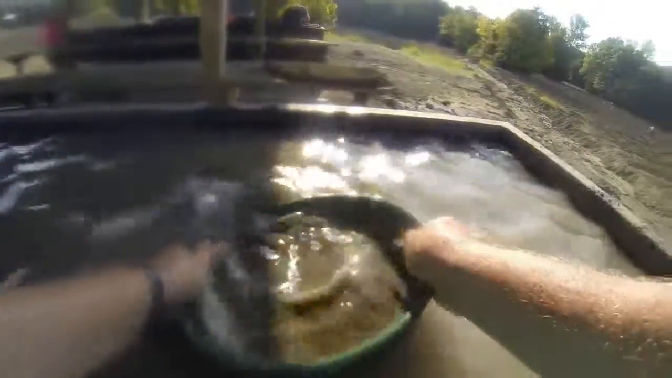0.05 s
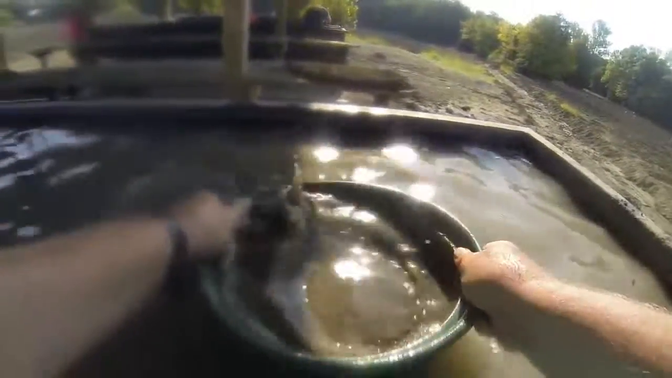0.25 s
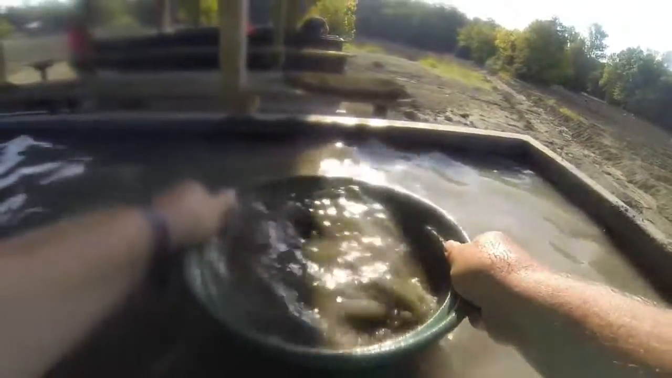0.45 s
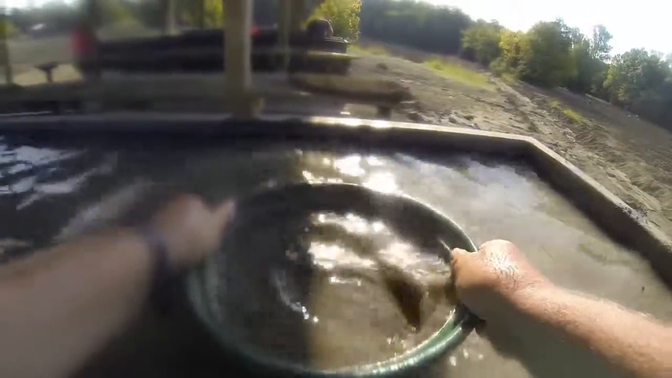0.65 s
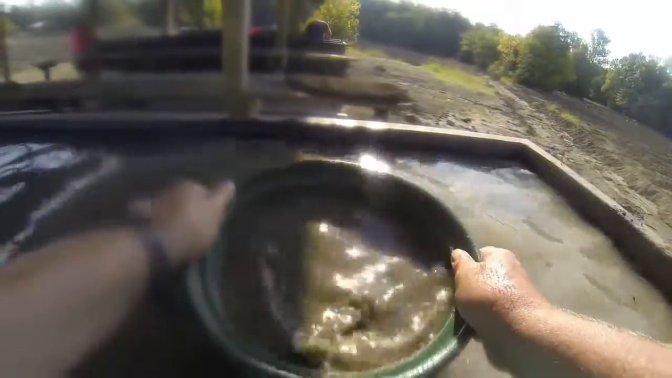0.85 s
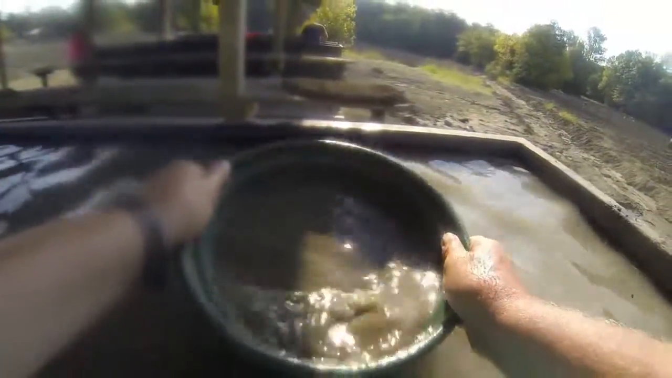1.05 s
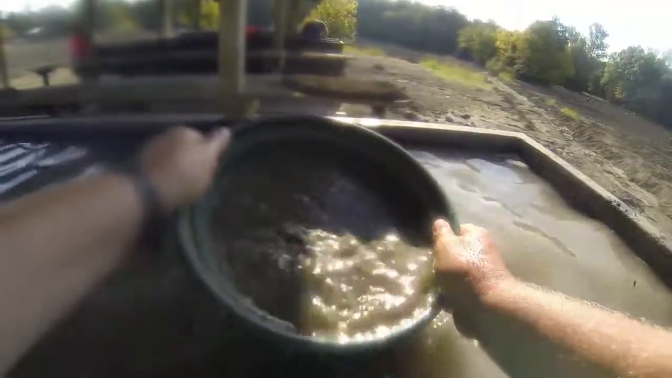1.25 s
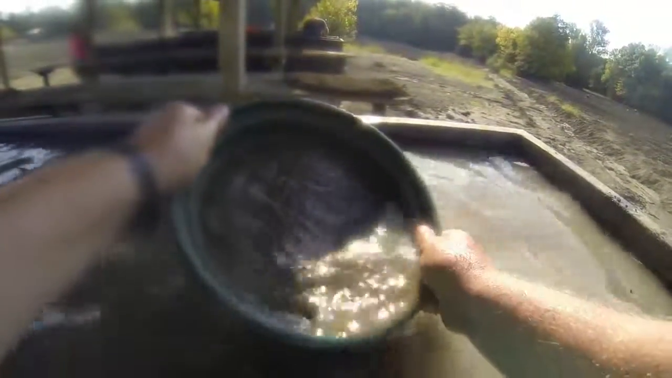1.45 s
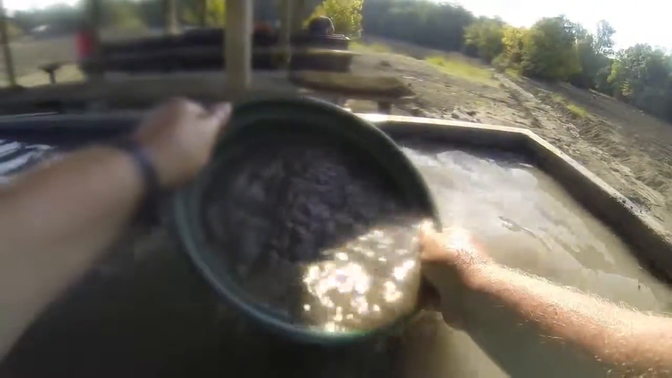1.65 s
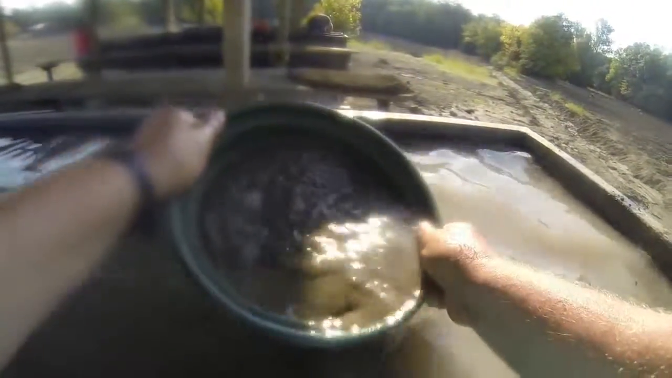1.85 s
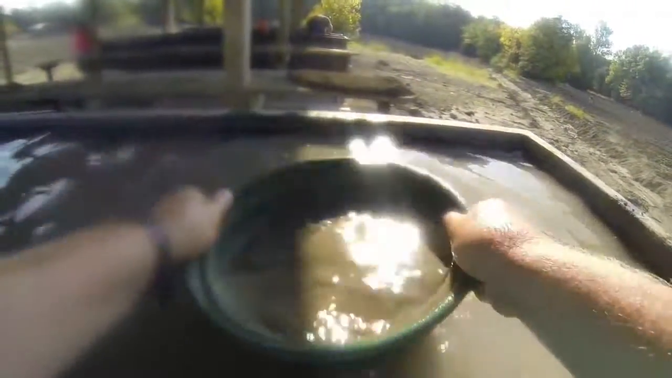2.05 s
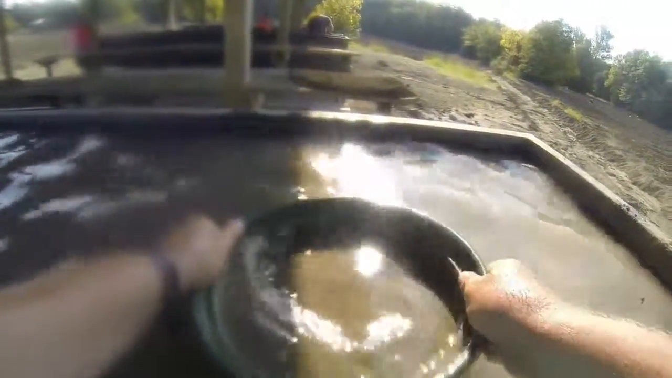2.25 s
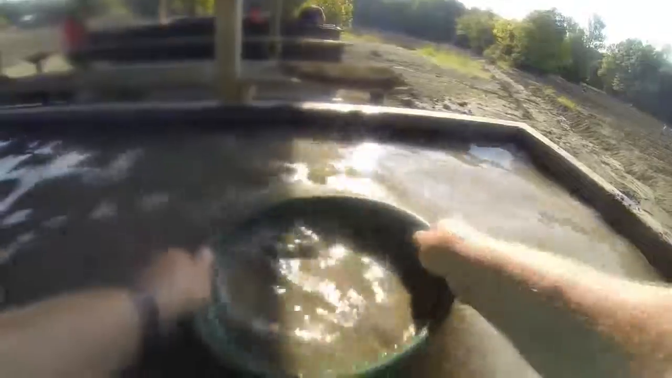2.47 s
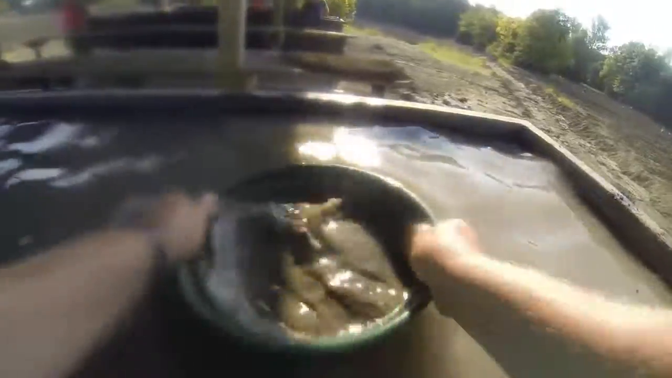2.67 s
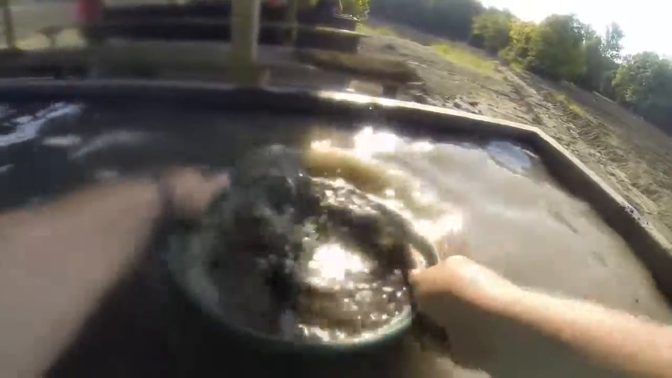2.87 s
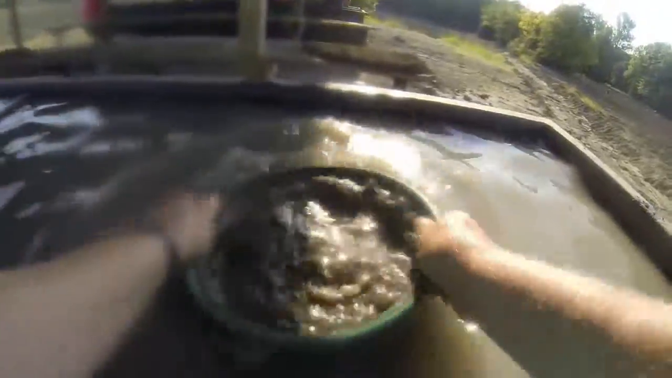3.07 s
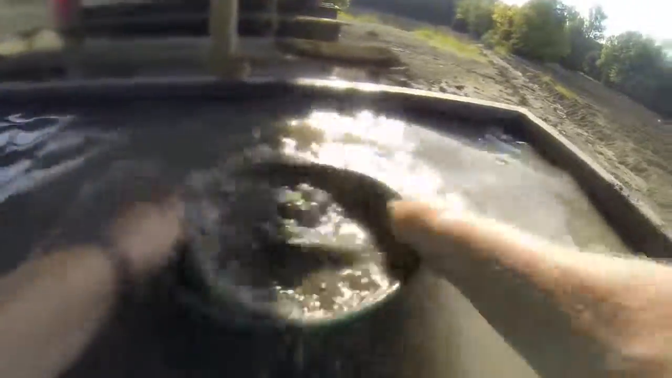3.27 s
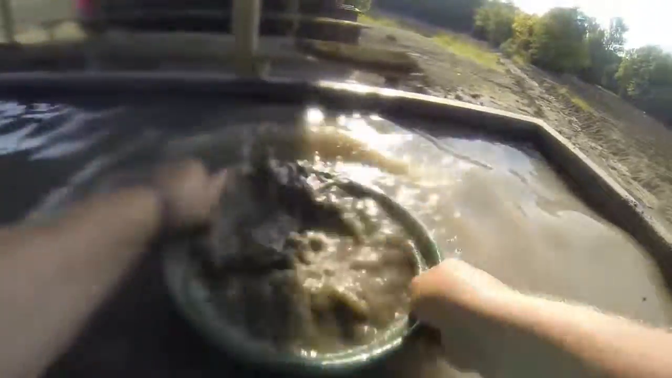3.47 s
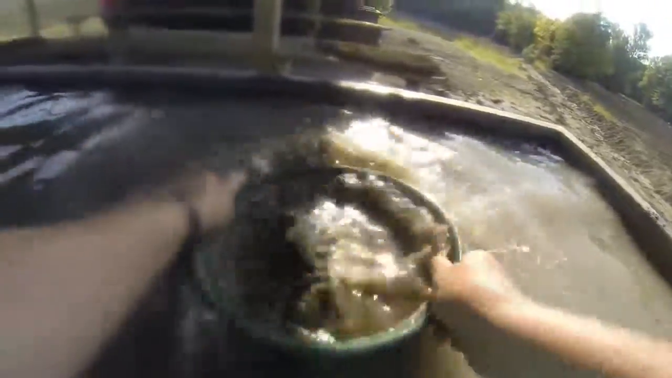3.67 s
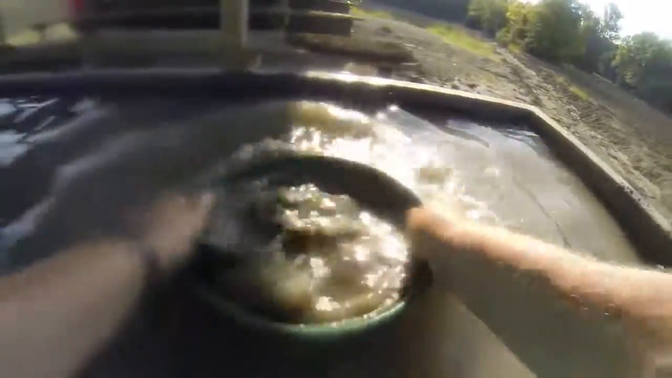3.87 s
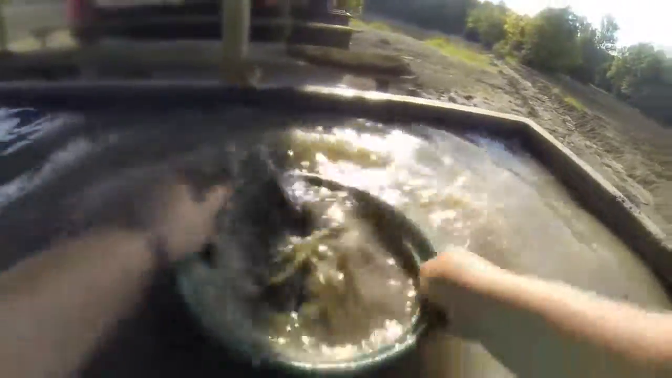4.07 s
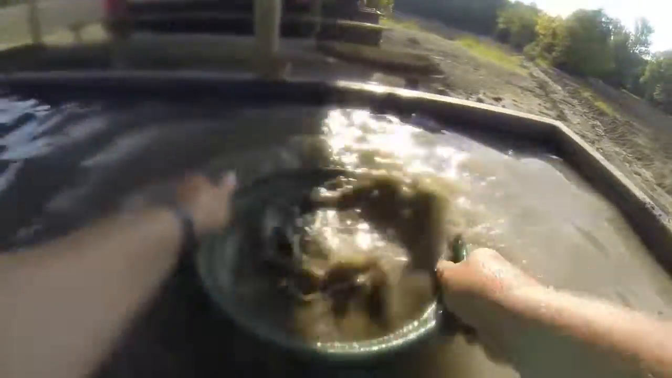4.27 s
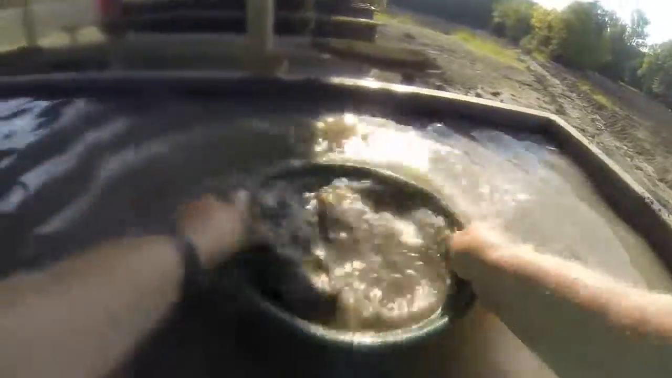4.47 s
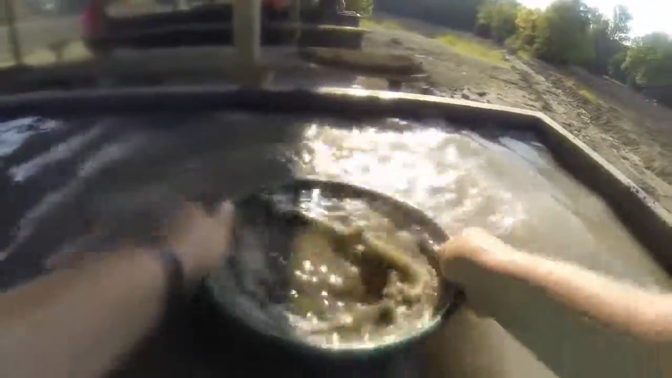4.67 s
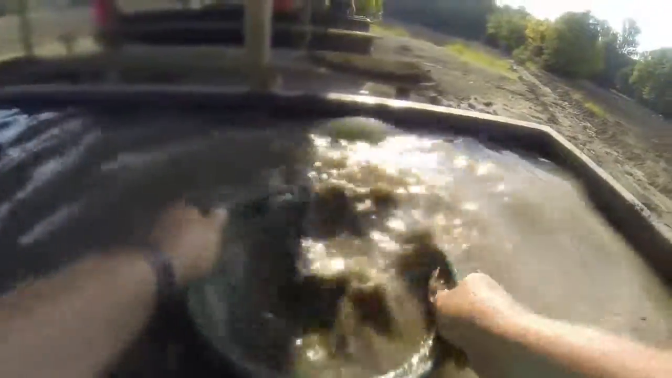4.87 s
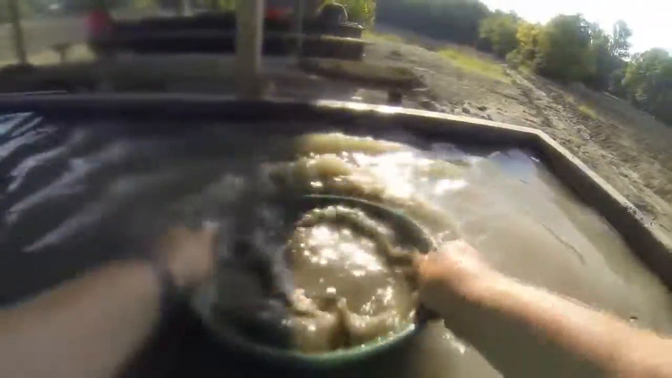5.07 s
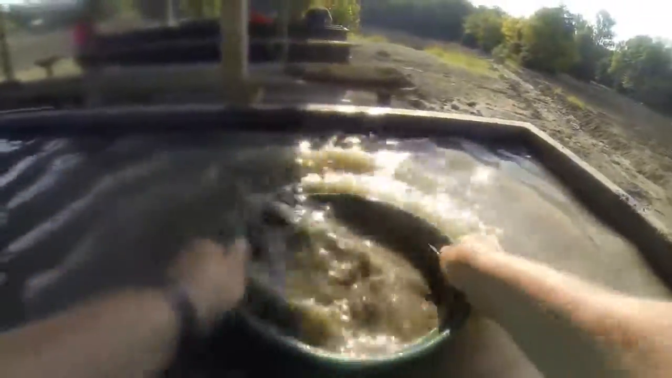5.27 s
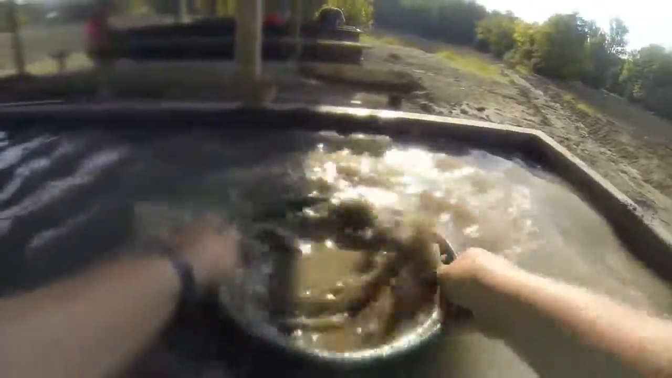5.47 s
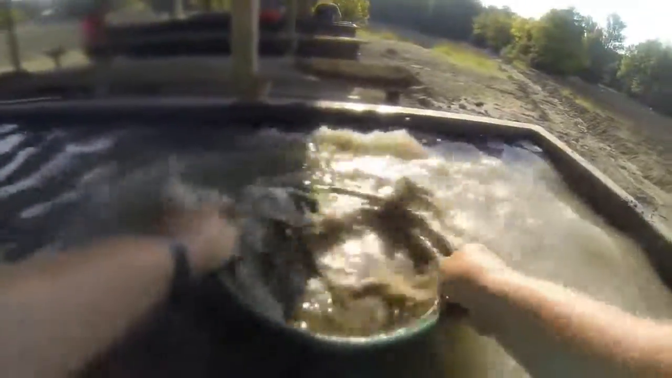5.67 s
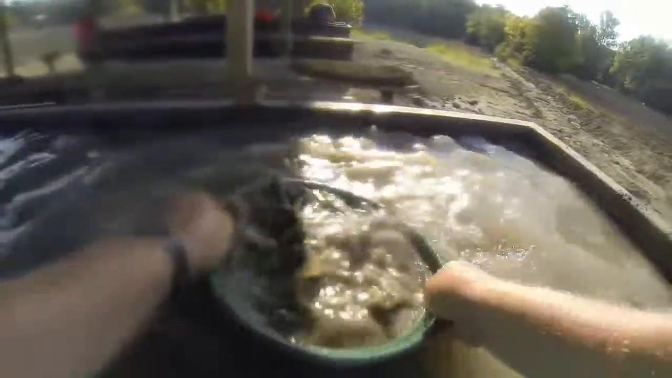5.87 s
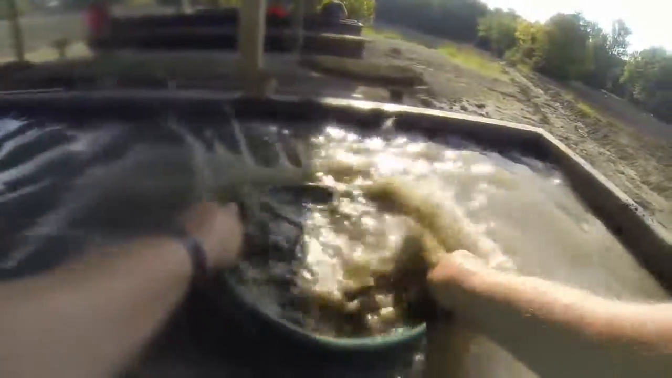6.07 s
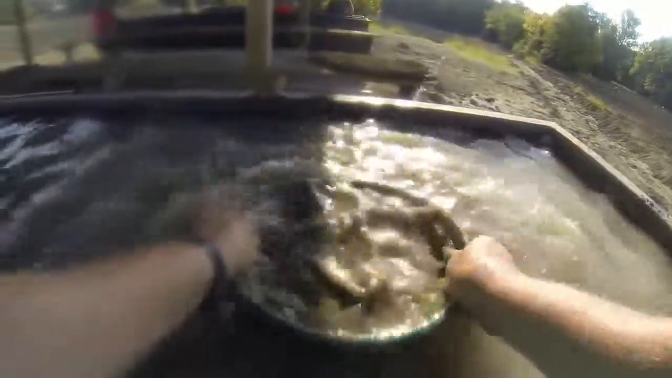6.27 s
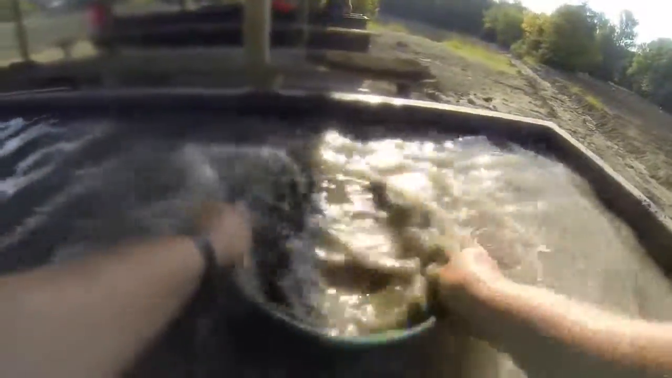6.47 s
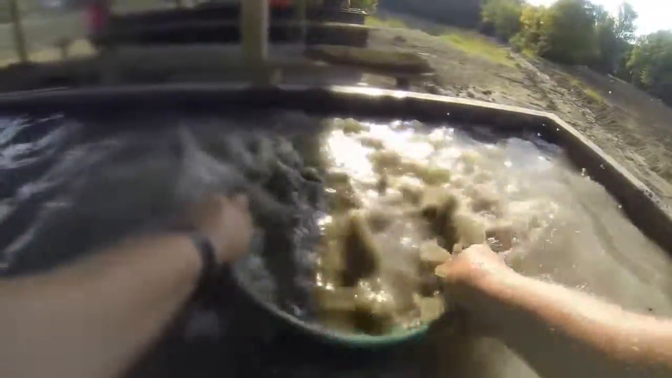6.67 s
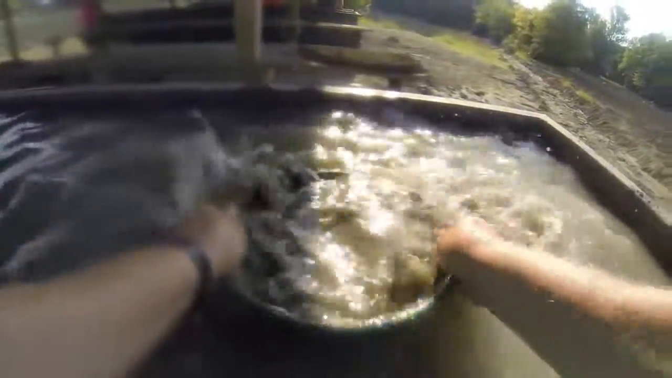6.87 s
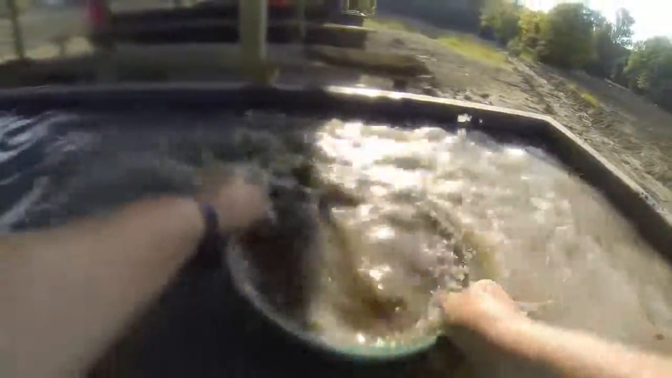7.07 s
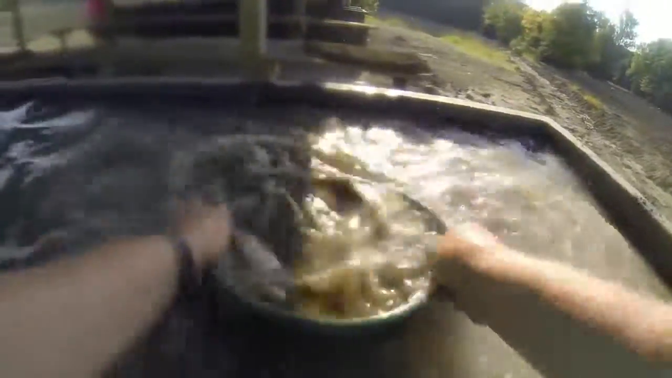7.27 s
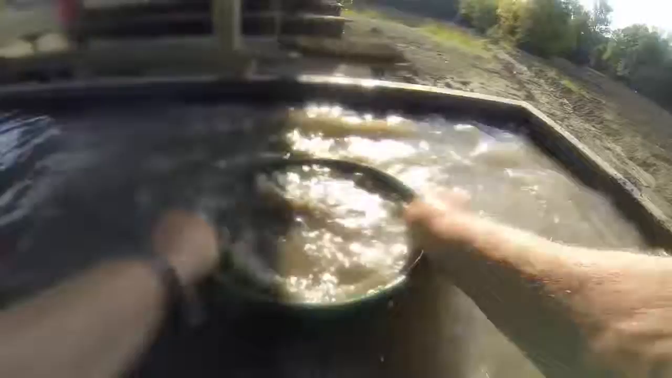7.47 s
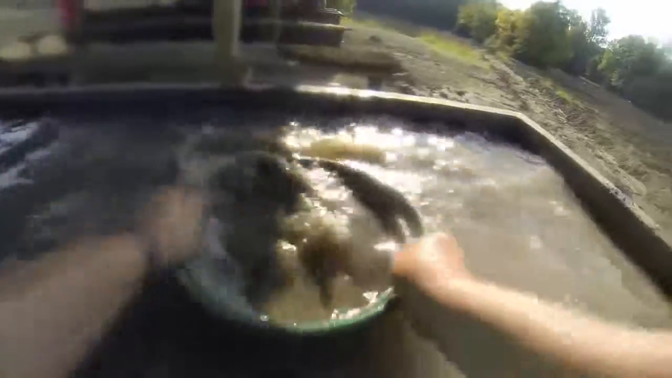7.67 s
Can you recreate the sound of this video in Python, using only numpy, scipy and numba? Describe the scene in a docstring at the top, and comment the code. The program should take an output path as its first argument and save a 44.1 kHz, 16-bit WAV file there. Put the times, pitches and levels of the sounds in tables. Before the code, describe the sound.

A sieve drips softly, then is shaken in water with boxy sloshing, plopping bubbles, ticking stones and rumbling handling bumps.

```python
"""A sieve of dirt and stones is shaken in a water trough, heard inside the case of a body-worn camera.
It opens on a brief slosh and a few thumps of the strap; then the sieve drains in clear drips while
insects buzz faintly over a quiet field. Just after two seconds the shaking sets in and runs to the end:
bubbles plop, stones tick, and the wash and spray colour through the case's resonances. The shakes
knock the case on its mount and heave the body, which rumbles and thumps."""
import sys
import numpy as np
from scipy import signal
from scipy.io import wavfile
from scipy.ndimage import uniform_filter1d
from numba import njit

SR = 44100
rng = np.random.default_rng(int(sys.argv[2]) if len(sys.argv) > 2 else 0)


def generate_wav(sig):
    """Save sig (samples, or channels by samples) to the path in sys.argv[1] as 16-bit PCM at SR."""
    pcm = np.round(np.clip(np.atleast_2d(sig).T, -1, 1) * 32767).astype(np.int16)
    wavfile.write(sys.argv[1], SR, pcm)


N = 340893


def undb(db):
    return 10 ** (np.asarray(db) / 20)


def level(x, db):
    return x * undb(db) / np.sqrt(np.mean(x ** 2))


@njit
def bandpass(x, hz, width):
    """State-variable band-pass, gain 1 at the centre."""
    y, mid, low = np.empty(len(x)), 0., 0.
    g, damping = np.tan(np.pi * hz / SR), width / hz
    for i in range(len(x)):
        v = (mid + g * (x[i] - low)) / (1 + g * (g + damping))
        mid, low, y[i] = 2 * v - mid, low + 2 * g * v, damping * v
    return y


def band(hz, width):
    """Noise in a steep band, rms 1."""
    return level(bandpass(bandpass(rng.standard_normal(N), hz, width), hz, width), 0)


def flutter(rate):
    """Smooth random motion, rate steps a second, spread near 1."""
    hold = int(SR / rate)
    steps = np.repeat(rng.standard_normal(N // hold + 1), hold)
    return 1.93 * uniform_filter1d(uniform_filter1d(steps, hold), hold)[:N]


@njit
def rings(starts, hz, t60, size, rise, glide):
    """Damped tones with an attack time of rise seconds; pitch bends by the share glide in one t60."""
    out = np.zeros(N)
    for e in range(len(starts)):
        first, n = int(starts[e] * SR), max(t60[e] * SR, 4.)
        phase, env, hush = 0., size[e], 1.
        fall, lift = 1000. ** (-1 / n), np.exp(-1 / (rise * SR))
        for i in range(min(int(n), N - first)):
            phase += 2 * np.pi * min(hz[e] * (1 + glide * i / n) / SR, .45)
            env, hush = env * fall, hush * lift
            out[first + i] += env * (1 - hush) ** 2 * np.sin(phase)
    return out


def puffs(starts, size, rise, fall):
    """An envelope with a soft-edged puff at each start; rise and fall in seconds."""
    hits = np.zeros(N)
    np.add.at(hits, (starts * SR).astype(int), size)
    for tau in (rise, fall):
        hits = signal.lfilter([1], [1, -np.exp(-1 / (tau * SR))], hits)
    return hits / (rise * SR)


def scatter(per_s, spread_db, clump):
    """Random starts, sizes (many small, a few large, louder in clumps) and a 0-1 draw for pitch."""
    when, weight, pitch = rng.random((int(per_s * N / SR), 3)).T
    starts = when * (N - 1) / SR
    large = np.minimum(-np.log(1 - weight), 3)
    return starts, clump[(starts * SR).astype(int)] * undb(spread_db * large), pitch


def swarm(per_s, low_hz, high_hz, cycles, spread_db, clump, rise, glide):
    """Random ringing grains over a range of pitch."""
    starts, size, pitch = scatter(per_s, spread_db, clump)
    hz = low_hz * (high_hz / low_hz) ** pitch
    return rings(starts, hz, cycles / hz, size, rise, glide)


# The bed of outdoor air. Each row: frequency in Hz, noise density in dB.
AIR_SPECTRUM = [(60, -75.5), (150, -99), (300, -89), (600, -102), (1300, -100), (2500, -105), (4500, -116),
                (8000, -120), (15000, -123)]
# The insect buzz. Each row: centre in Hz, width in Hz, level in dB.
INSECT_BANDS = [(5070, 210, -79.5), (7000, 2300, -83.5), (10110, 1700, -74.5)]


def field():
    """Steady insects over quiet air, whose half-octave bands flicker most in the lows."""
    air_hz, air_db = np.transpose(AIR_SPECTRUM)
    out = sum(undb(db) * band(hz, width) for hz, width, db in INSECT_BANDS)
    for hz in 60 * 2 ** np.arange(0, 8.1, .5):
        db = np.interp(np.log(hz), np.log(air_hz), air_db) + 10 * np.log10(hz / 3)
        flicker_db = np.interp(hz, (400, 2000), (3.5, 1.5)) * flutter(8.7)
        out += undb(db + flicker_db) * band(hz, hz / 2)
    return out


# The case hits its mount. Each row: start in seconds, level in dB.
MOUNT_HITS = [(0.319, -43.5), (2.515, -37), (2.697, -33), (2.742, -35), (2.819, -15), (2.993, -34),
              (3.07, -26), (3.377, -19.5), (3.685, -20.5), (3.951, -19), (4.231, -37), (4.279, -28.5),
              (4.473, -37), (4.553, -28.5), (4.868, -26.5), (5.122, -25), (5.383, -27), (5.502, -36),
              (5.639, -33), (7.283, -27), (7.577, -21)]
# The ring of the plastic. Each row: pitch in Hz, gain in dB, time to fall 60 dB in seconds.
PLASTIC_MODES = [(464, 4.5, 0.027), (367, -4.5, 0.035), (590, -11.5, 0.048), (776, 1, 0.0081),
                 (133.5, -11, 0.11)]


def knocks():
    """A sharp contact, then the plastic rings, and rings again more softly as the case rebounds."""
    starts, db = np.transpose(MOUNT_HITS)
    each = np.ones_like(starts)
    bite = undb(1.3 * db + 15)  # harder knocks are sharper
    contact = rings(starts, 1870 * each, .0069 * each, bite, rise=.00059, glide=-.64)
    starts, db = np.r_[starts + .0012, starts + .0085], np.r_[db, db - 9]  # hit, then rebound
    detune = 1 + .04 * rng.standard_normal(len(starts))  # each lands a little differently
    plastic = sum(rings(starts, hz * detune, np.full_like(starts, t60), undb(db + gain_db + 7),
                        rise=.00063, glide=0.) for hz, gain_db, t60 in PLASTIC_MODES)
    return plastic - contact


# How hard the body works. Each row: time in seconds, rumble level between jolts in dB.
EFFORT_CURVE = [(0.0, -15.5), (0.15, -46.5), (0.55, -33), (1.3, -51), (1.5, -41), (1.8, -57), (2.02, -40),
                (2.35, -47), (2.5, -27), (3.0, -27.5), (3.4, -27), (3.6, -30), (4.35, -30), (4.6, -29.5),
                (5.2, -33), (5.8, -31.5), (6.1, -35.5), (6.8, -32), (7.05, -32), (7.5, -32), (7.7, -27)]


def heave(t):
    """The rumble's fader in dB: slow effort, with a swell just after each hard knock."""
    jolt_db, late_s, width_s = 7.5, .053, .053
    starts, db = np.transpose(MOUNT_HITS)
    strengths = np.clip(1 + (db + 26) / 6, 0, 1)  # no jolt below -32 dB, a full one from -26 dB
    jolts = sum(strength * np.exp(-.5 * ((t - start - late_s) / width_s) ** 2)
                for start, strength in zip(starts, strengths))
    return np.interp(t, *np.transpose(EFFORT_CURVE)) + jolt_db * np.minimum(jolts, 1)


# Low thumps of the strap. Each row: start in seconds, level in dB, pitch in Hz.
STRAP_JERKS = [(0.248, -31, 113), (0.398, -19, 88), (0.662, -36, 67.3), (2.15, -42, 120),
               (2.329, -41.5, 152), (2.523, -17.5, 85), (2.762, -20.5, 104), (2.822, -26, 122),
               (2.996, -17, 73), (3.092, -15.5, 70.3), (3.209, -24, 89), (3.635, -23.5, 120),
               (3.766, -26, 140), (3.834, -31.5, 137), (3.924, -20.5, 71), (4.038, -28, 114),
               (4.179, -22, 130), (4.333, -36, 115), (5.391, -17, 76.5), (5.665, -21.5, 71.3),
               (6.216, -29, 69), (6.867, -24.5, 78), (7.084, -29.5, 125), (7.29, -29, 150),
               (7.413, -23.5, 71.6), (7.569, -15.5, 74.4)]


def body(rumble_db):
    """The chest heaves under the camera: deep rumble, small bumps of cloth, jerks as the strap goes taut."""
    starts, db, hz = np.transpose(STRAP_JERKS)
    pull = rings(starts, hz, 7 / hz, undb(db + 13), rise=.0072, glide=.054)
    snap = rings(starts + .00724, 1.113 * hz, 3.13 / hz, undb(db + 12.5), rise=.00025, glide=.066)
    cloth = swarm(90, 60, 380, cycles=3, spread_db=2.5, clump=undb(2 * flutter(9)), rise=.0015, glide=0.)
    cloth_db = uniform_filter1d(rumble_db, SR // 3) - 10
    rumble = band(19.7, 26.8) + level(band(14.75, 7.2), 1.16)
    return pull + snap + undb(rumble_db) * rumble + level(cloth, cloth_db)


# The boxy colour on the water. Each row: centre in Hz, width in Hz, gain in dB.
CASE_MODES = [(844, 907, -3), (1375, 108, 13), (1725, 73, 8), (1961, 134, 6), (2258, 376, 0.5),
              (3040, 1070, -7), (3970, 810, -11.5), (5160, 220, -10.5), (5590, 1350, -20), (6680, 600, -13),
              (8800, 12300, -28)]


def case(x):
    """The air in the closed case rings at its own modes, which alternate in polarity."""
    return sum((-1) ** k * undb(db) * bandpass(x, hz, width)
               for k, (hz, width, db) in enumerate(CASE_MODES))


# Clear drips while the sieve drains. Each row: start in seconds, level in dB, pitch in Hz.
DRAIN_DRIPS = [(0.162, -31, 1430), (0.1974, -29.5, 1243), (0.252, -30.5, 1446), (0.51, -28, 2130),
               (0.5363, -40, 2480), (0.634, -41, 2250), (0.7815, -38, 2020), (0.85, -34.5, 1950),
               (0.87, -43, 4360), (0.886, -35, 1980), (0.891, -33, 1440), (1.075, -45, 4500),
               (1.183, -37, 1304), (1.205, -39, 1980), (1.264, -33, 1460), (1.33, -28.5, 1270),
               (1.545, -38, 1630), (1.621, -40, 2980), (1.6886, -36, 1276), (1.714, -40, 1560),
               (1.748, -34, 1280)]


def drips():
    """Each drop leaves one bubble that climbs a little in pitch, inside a soft trickle."""
    starts, db, hz = np.transpose(DRAIN_DRIPS)
    trickle = puffs(starts, undb(db - 23.5), .0027, .015) * level(case(band(1080, 4000)), 0)
    return rings(starts, hz, 98 / hz, undb(db - 9.5), rise=.00049, glide=.078) + trickle


# Bright ticks on top. Each row: start in seconds, level in dB, pitch in Hz.
STONE_TICKS = [(0.1615, -36, 6560), (0.536, -45.5, 3440), (0.628, -47, 3220), (1.6904, -44, 3800),
               (1.7177, -45.5, 2950), (1.924, -38.5, 3140), (2.179, -36, 2850), (2.202, -36, 3800),
               (2.323, -42, 4970), (2.339, -35, 5570), (2.3618, -32.5, 3120), (2.772, -35, 5200),
               (2.882, -37, 3950), (3.084, -32, 7000), (3.15, -32, 3220), (3.172, -38, 5150),
               (3.4085, -42, 3800), (3.641, -44, 5060), (3.687, -29, 5640), (3.699, -32.5, 6260),
               (4.127, -44, 4860), (4.217, -43, 8800), (4.247, -36.5, 4050), (4.268, -41, 5960),
               (4.553, -48, 4140), (4.66, -40.5, 6440), (4.8382, -35.5, 3940), (5.146, -43, 6700),
               (5.33, -38, 3850), (5.423, -31, 5000), (5.49, -40, 5100), (5.639, -33, 9700),
               (5.762, -39, 5350), (5.879, -39, 5000), (5.942, -39.5, 3560), (6.011, -30, 3900),
               (6.032, -31.5, 4860), (6.061, -35.5, 4000), (6.13, -32, 3950), (6.2457, -32, 4030),
               (6.299, -27.5, 6100), (6.412, -32, 3490), (6.482, -35, 5970), (6.499, -39, 6600),
               (6.586, -35.5, 6340), (6.7, -38, 6000), (6.767, -38, 6840), (6.819, -35, 3900),
               (6.866, -38.5, 5550), (7.086, -39.5, 6300), (7.128, -40, 5560), (7.235, -32, 3760),
               (7.325, -41, 6440), (7.495, -42, 6100), (7.53, -45, 6640)]


def ticks():
    """Stones and drops tick: a short ring inside a spit of noise that is strongest near its pitch."""
    starts, db, hz = np.transpose(STONE_TICKS)
    ring = rings(starts, hz, 44 / hz, undb(db - 1), rise=.0007, glide=.04)
    fizz_db = db - 15 + 11 * np.log2(hz / 5000)  # the finest spray is brightest
    out = ring + puffs(starts, undb(fizz_db), .00024, .0014) * band(6900, 12000)
    for mid_hz in (2600, 4000, 6200):
        spit_db = db - 10 * np.abs(np.log2(hz / mid_hz))
        out += puffs(starts, undb(spit_db), .00029, .0043) * level(case(band(mid_hz, mid_hz)), -3.5)
    return out


# Big, up-front bubbles. Each row: start in seconds, level in dB, pitch in Hz.
BUBBLE_PLOPS = [(1.924, -36.5, 1323), (2.198, -30.5, 1327), (2.255, -27.5, 1333), (2.285, -39, 1350),
                (2.32, -29.5, 1234), (2.3364, -19, 1290), (2.4451, -21, 1390), (2.472, -25, 1440),
                (2.5114, -22, 1350), (2.7753, -25, 1394), (2.886, -29.5, 724), (2.997, -23.5, 1426),
                (3.103, -21.5, 1415), (3.1518, -21, 1304), (3.435, -30, 1335), (3.599, -28.5, 1280),
                (3.6823, -25, 1260), (4.046, -31, 1500), (4.247, -21.5, 1396), (4.427, -31.5, 1420),
                (4.473, -30.5, 1233), (4.569, -32.5, 1410), (4.6292, -26.5, 1320), (4.66, -30, 1276),
                (4.6806, -24.5, 1365), (4.741, -29, 1350), (5.11, -32, 1430), (5.3322, -27, 1292),
                (5.415, -29.5, 750), (5.634, -26, 1306), (5.723, -23.5, 1378), (5.7609, -26, 1380),
                (5.9418, -25.5, 1362), (6.008, -28.5, 1384), (6.0294, -25, 1400), (6.0405, -20.5, 1950),
                (6.106, -28, 1364), (6.1754, -25.5, 1380), (6.297, -27.5, 1388), (6.4048, -24.5, 1343),
                (6.482, -23.5, 1310), (6.6802, -22.5, 1170), (6.823, -22, 1366), (6.972, -28, 1385),
                (7.181, -33.5, 1720), (7.52, -28.5, 1410)]


def plops():
    """A bubble swells and rings; the slap of water around it shakes the case."""
    starts, db, hz = np.transpose(BUBBLE_PLOPS)
    tone = rings(starts, hz, np.full_like(starts, .044), undb(db + 2.5), rise=.0011, glide=.034)
    slap = puffs(starts, undb(db), .00099, .0099) * level(case(band(1340, 5000)), -9)
    return tone + slap


def foam(per_s, clump):
    """Bursting foam crackles softly: some spits fill one part of the treble, others all of it."""
    starts, size, _ = scatter(per_s, 4.5, clump)
    wide, out = puffs(starts, size, .001, .003), 0
    for hz in (3220, 4100, 6000, 8400, 12900):
        starts, size, _ = scatter(per_s, 4, clump)
        narrow = puffs(starts, size, .0012, .0032)
        out += (narrow + .4 * wide) * band(hz, hz * .6) * undb(.5 * np.log2(hz / 3200))
    return out


# How hard the sieve stirs the water. Each row: time in seconds, slosh level in dB, spray level in dB.
STIR_CURVE = [(0.0, -38, -46), (0.11, -56.5, -67), (0.34, -56.5, -64), (0.6, -58, -72),
              (1.12, -62.5, -69.5), (1.27, -58.5, -76), (1.57, -72.5, -72.5), (2.15, -59, -69),
              (2.39, -55.5, -56), (2.5, -57, -73), (2.75, -45.5, -58), (2.99, -46, -59.5),
              (3.12, -42.5, -57), (3.25, -45, -61.5), (3.4, -46, -56), (3.55, -44, -58), (3.74, -41, -54.5),
              (3.94, -48, -60), (4.09, -42, -55), (4.41, -49, -58), (4.52, -49, -54.5), (4.72, -44.5, -59),
              (4.84, -47.5, -61.5), (5.08, -49.5, -62), (5.38, -47, -59), (5.57, -45, -54.5),
              (6.37, -49.5, -57), (6.48, -45.5, -56.5), (6.67, -39, -48.5), (6.82, -43.5, -56.5),
              (6.95, -44.5, -52), (7.21, -46.5, -56.5), (7.38, -45, -61), (7.58, -48, -67),
              (7.73, -44.5, -48.5)]


def slosh(t):
    """Stirred water throws up bubbles, a flowing wash, droplets and foam, all heard through the case."""
    times, *faders = np.transpose(STIR_CURVE)
    slosh_db, spray_db = (np.interp(t, times, fader) + 2.5 for fader in faders)
    bubbles_per_s, drops_per_s = 330, 70
    surge = flutter(34)  # water breaks in bursts that raise every layer together
    bubbles = swarm(bubbles_per_s, 421.4, 2834, cycles=45, spread_db=4, clump=undb(2.54 * surge),
                    rise=.00067, glide=.22)
    wash = undb(1.14 * surge + 2.4 * flutter(60)) * rng.standard_normal(N)
    churn = level(bubbles, 0) + level(bandpass(wash, 1300, 2600), -2)
    drops = swarm(drops_per_s, 4200, 11000, cycles=38, spread_db=3, clump=undb(1.6 * surge),
                  rise=.0009, glide=.04)
    hiss = undb(2.2 * surge + 2.2 * flutter(70)) * band(8000, 14000)
    spray = level(drops, -6) + level(foam(40, undb(2 * surge)), -2) + level(hiss, -1.5)
    return level(case(churn), slosh_db) + level(case(spray), spray_db)


def scene():
    """Water, handling noise and the field, mixed in mono."""
    t = np.arange(N) / SR
    water = slosh(t) + plops() + ticks() + drips()
    return (water + knocks() + body(heave(t)) + field())[None]


def record(dry):
    """The recorder cuts the top with a steep low-pass."""
    top_hz = 15800
    return signal.sosfilt(signal.ellip(10, .2, 80, top_hz, fs=SR, output="sos"), dry)


dry = scene()
out = record(dry)
generate_wav(out)
```